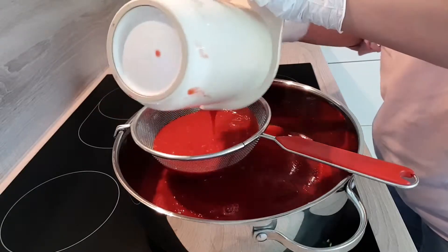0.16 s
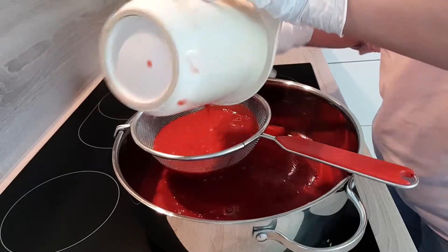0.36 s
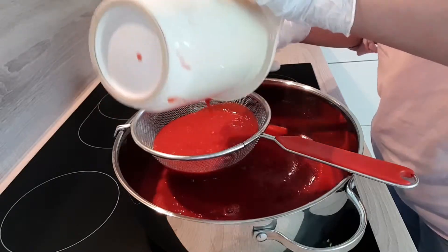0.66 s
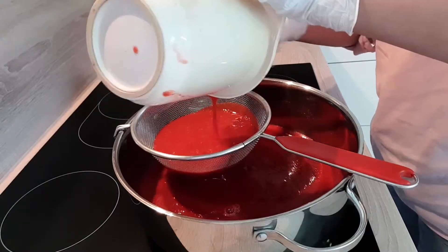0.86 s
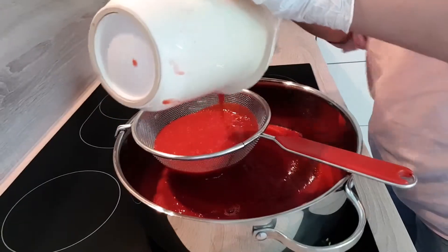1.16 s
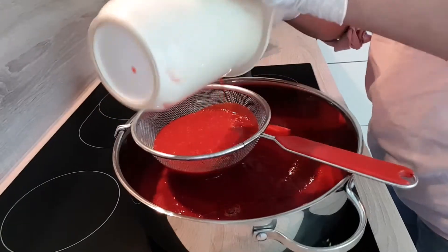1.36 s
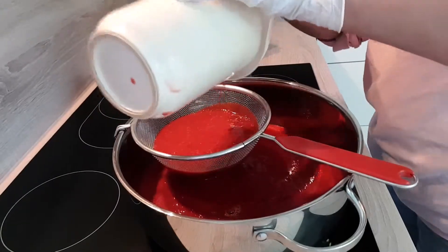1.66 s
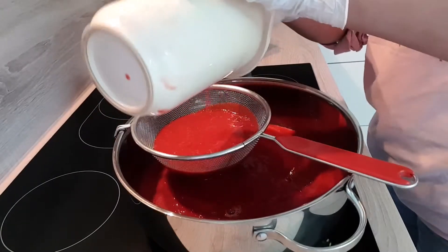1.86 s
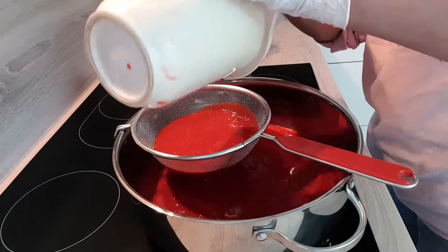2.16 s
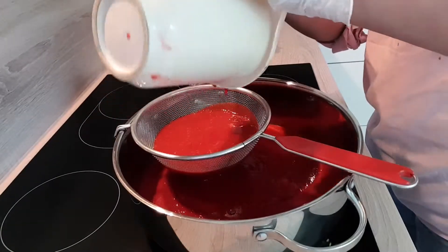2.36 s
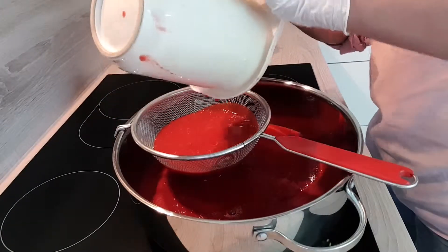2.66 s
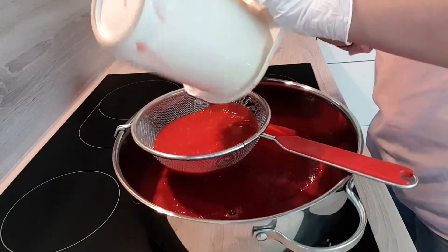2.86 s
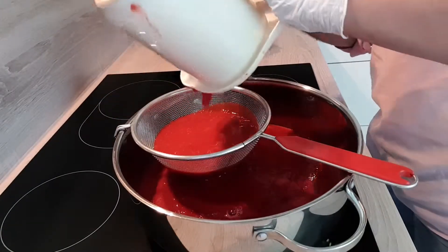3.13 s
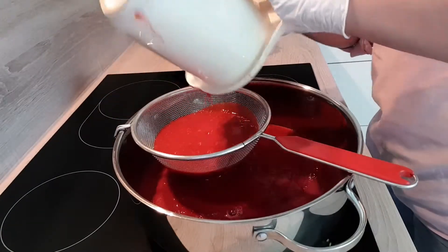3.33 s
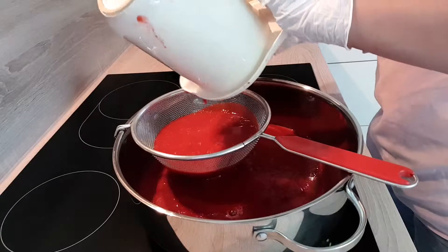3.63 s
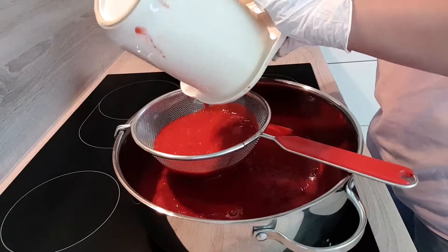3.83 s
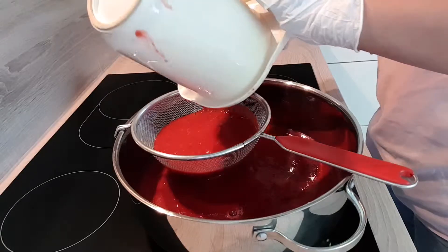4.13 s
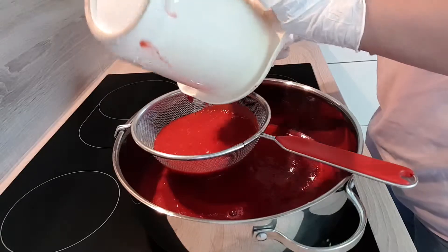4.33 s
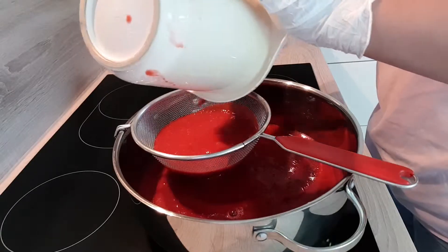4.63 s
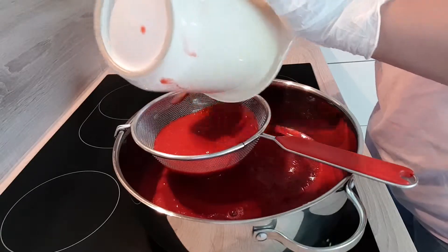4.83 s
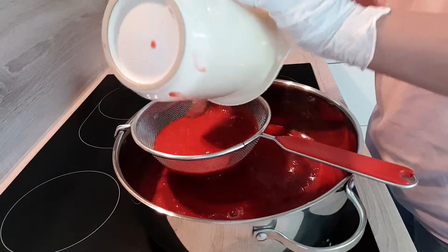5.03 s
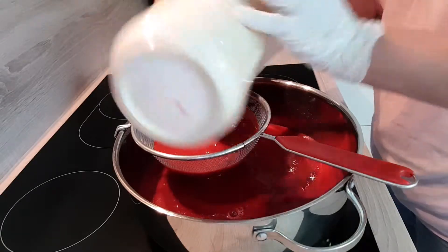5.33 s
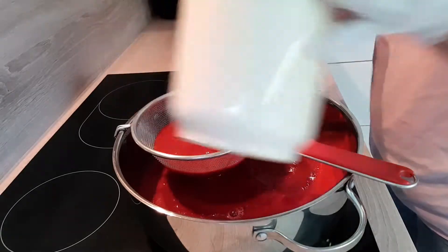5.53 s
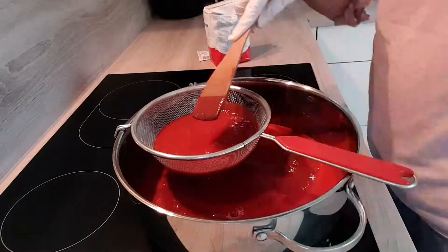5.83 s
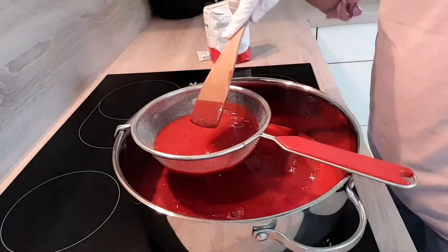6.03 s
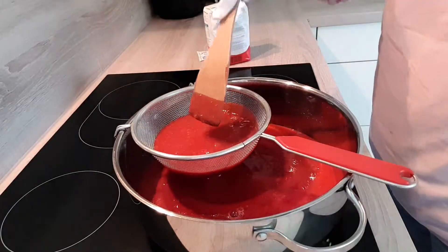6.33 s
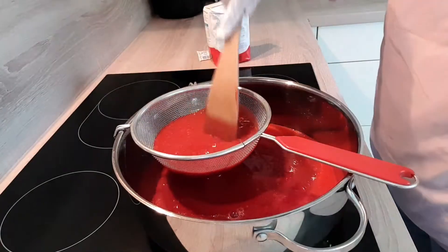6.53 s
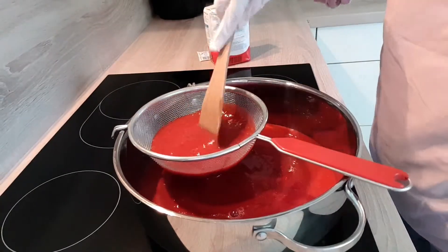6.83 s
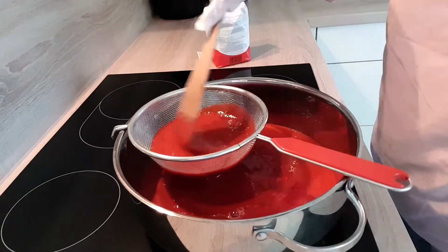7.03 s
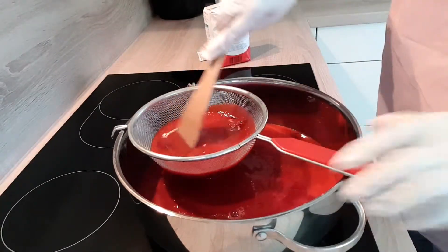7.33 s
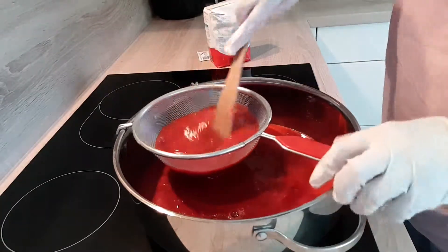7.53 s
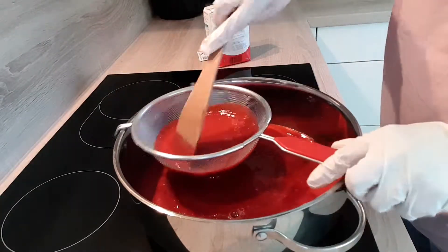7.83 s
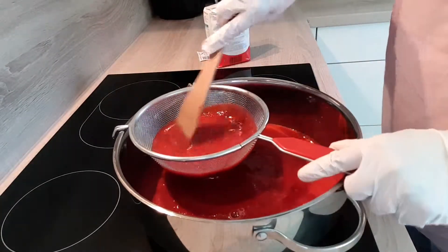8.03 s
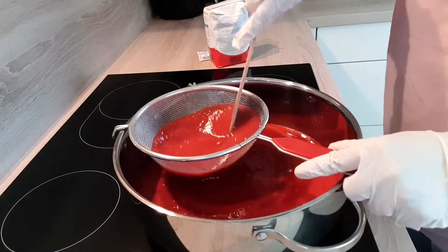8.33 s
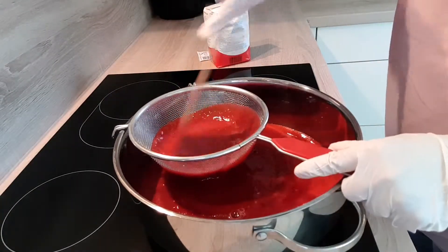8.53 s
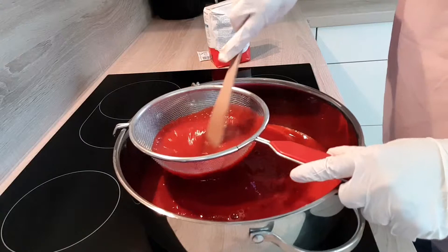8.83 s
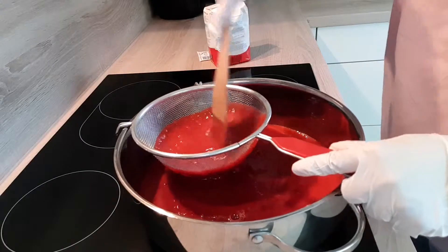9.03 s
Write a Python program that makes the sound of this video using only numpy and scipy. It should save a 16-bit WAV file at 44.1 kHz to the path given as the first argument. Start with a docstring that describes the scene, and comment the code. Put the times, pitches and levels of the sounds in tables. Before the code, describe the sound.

A small kitchen with short reflections, heard closely in stereo over faint hiss. From 0.1 to 1.6 s, blobs of puree smack sharply into a steel sieve, bright and wet, with wiry ringing and a hollow mid-low note from the pot; the strongest lands near 0.8 s. Dull, rounded plops begin at 1.3 s and cluster around 1.9-2.4, 3.1 and 4.1 s. Low handling rumble and glove rubs rise near 3 s, with more rustles at 3.8-4.5 s. A last, duller smack falls at 4.9 s. Around 5.4-5.9 s the jug and gloves rub and squeak briefly. A heavy soft thump at 6.3 s comes with a faint wet hiss. From 6.7 s light ticks and gritty spatula presses work the mesh, with woody-metallic knocks at 7.4 and 7.9 s, low rumble around 8.1 s, and a stronger scrape and quick knocks at 8.7-8.9 s.

```python
"""A small kitchen, with a pair of microphones close to a steel sieve over a pot; a faint hiss runs throughout.
First come sharp wet smacks: noise bursts, ringing resonances and a hollow note of air. Dull plops mingle with
the smacks and go on among rubs, rustles and squeaks of gloves and jug: friction noise. Last a wooden spatula
knocks on the sieve and presses the puree through the mesh in gritty strokes. Handling and soft blows rumble
through the worktop as low noise and decaying sines."""
import sys
import numpy as np
from scipy import signal
from scipy.fft import rfft, irfft, next_fast_len
from scipy.io import wavfile
from scipy.ndimage import map_coordinates

SR = 44100
rng = np.random.default_rng(int(sys.argv[2]) if len(sys.argv) > 2 else 0)


def dump_mix(stems):
    """Bounce the given channels to the path in sys.argv[1] as a 16-bit WAV at rate SR."""
    frames = np.atleast_2d(stems).T  # one column per channel
    limited = np.clip(frames, -1, 1)  # hard clip at full scale
    pcm = np.round(limited * 32767).astype(np.int16)
    wavfile.write(sys.argv[1], SR, pcm)


N = 405279  # length in samples

# background hiss over time: start_s [s], level_db [dB]
AIR_LEVEL = [(0, -66.5), (1.597, -71.5), (2.599, -63.5), (3.498, -60.5), (3.702, -73.5), (5.298, -71.5),
             (8.503, -62), (9.19, -58.5)]
# colour of the background hiss: freq_hz [Hz], density_db [dB per Hz, relative]
AIR_SPECTRUM = [(30, -7.5), (250, -29.5), (500, -18), (900, -25.5), (2300, -21.5), (3400, -25.5),
                (7400, -17.5), (9500, -32), (12300, -24.5), (15500, -30.5)]
# how long the room rings at each frequency: freq_hz [Hz], t60_s [s]
ROOM_DECAY = [(500, 0.41), (3700, 0.33), (9700, 0.26)]
WALL_S, WALL_DB = 0.0064, -5.5  # delay of the wall's echo, and its level over the room's answer
RIGHT_DB = 0.66  # each microphone's share of the lean to the right
TOP_HZ = 15600  # band limit of the recorder

# soft blows on the worktop: start_s [s], level_db [dB], pitch_hz [Hz], t60_s [s]
WORKTOP_BLOWS = [(0.879, -34, 79.8, 0.25), (1.108, -21, 179, 0.024), (1.141, -26, 100.6, 0.12),
                 (2.84, -19.5, 64.5, 0.19), (3.936, -22.5, 66.7, 0.31), (6.261, -4, 103.3, 0.078),
                 (6.264, -22.5, 182, 0.12), (7.355, -23, 121.8, 0.26), (7.812, -26.5, 99, 0.18),
                 (8.009, -17.5, 105.5, 0.25), (8.586, -26.5, 106, 0.11)]
# colour of the worktop's rumble: freq_hz [Hz], density_db [dB per Hz, relative]
WORKTOP_SPECTRUM = [(20, -25.5), (58, 3), (110, -3), (190, -23.5), (500, -27), (900, -74)]
# resonances of the pot under the sieve: freq_hz [Hz], width_hz [Hz], level_db [dB]
POT_MODES = [(92, 72, 1), (121, 39, -1.4), (156.3, 8, -2)]
GRIP_S = 7.1  # from this time on a hand holds the sieve
# handling rumble over time, before its lumps: start_s [s], level_db [dB]
HANDLING_LEVEL = [(2.0, -74.5), (2.699, -59), (2.98, -38.5), (3.24, -44.5), (3.699, -67), (3.92, -58),
                  (4.84, -57), (5.0, -64), (5.449, -66), (5.68, -36.5), (6.18, -51), (6.48, -45),
                  (7.41, -53.5), (7.78, -57), (8.01, -38), (8.149, -31), (8.451, -64.5), (8.767, -36),
                  (9.1, -76)]
HANDLING_BOWL_DB = -22.5  # its share in the bowl of the sieve
LUMPS_DB = 2.3  # random swing of the rumble

# glove and jug rubs: start_s [s], rise_s [s], level_db [dB of rasp], brightness_db [dB], contact_hz [Hz]
RUBS = [(2.76, 0.07, -57.5, -3.5, 1700), (3.03, 0.02, -43.5, -7, 1720), (3.752, 0.01316, -45.5, -8.5, 996),
        (3.905, 0.0036, -38, 5, 1751), (4.525, 0.059, -39.5, -3, 1092), (5.433, 0.025, -45.5, 0, 1492),
        (5.785, 0.01, -44, 1.5, 1204), (5.835, 0.02, -37, -3.5, 1540), (7.812, 0.013, -62, 5, 2260)]
RUB_FALL_S = 0.066  # release
RUB_RUMBLE_DB, RUB_BOWL_DB, RUB_HISS_DB = 3, -7, 0.45  # over the rasp, before brightness
# long soft hisses of puree in the mesh: start_s [s], level_db [dB of hiss], contact_hz [Hz]
SEEPS = [(3.26, -71.5, 2084), (6.213, -49, 2411)]
SEEP_RISE_S, SEEP_FALL_S = .06, 0.37
SEEP_RUMBLE_DB, SEEP_BOWL_DB, SEEP_RASP_DB = 10, -27.5, -7.5  # over the hiss
# the spatula presses against the mesh: start_s [s], rise_s [s], level_db [dB of bowl]
PRESSES = [(6.703, 0.013, -48), (6.82, 0.034, -61.5), (7.12, 0.048, -66), (7.301, 0.0066, -52),
           (7.397, 0.0097, -41.5), (7.942, 0.0032, -47), (7.99, 0.12, -41), (8.11, 0.072, -43),
           (8.245, 0.013, -45), (8.705, 0.011, -33.5), (8.755, 0.027, -44.5)]
PRESS_FALL_S, FALL_PER_RISE = 0.027, 0.43  # a slow push also lets go slowly
PRESS_RUMBLE_DB, PRESS_RASP_DB, PRESS_HISS_DB = -5.5, -19, -13.5  # over the bowl
PRESS_CONTACT_HZ = 1460
# colour of the rasp in the mesh: freq_hz [Hz], density_db [dB per Hz, relative]
RASP_SPECTRUM = [(200, -25), (480, 3.5), (1100, -0.5), (2100, -3.5), (3500, -10), (5500, -35)]
# colour of the hiss in the mesh: freq_hz [Hz], density_db [dB per Hz, relative]
HISS_SPECTRUM = [(2200, -8.5), (4000, -0.5), (7400, 0), (9000, -7.5), (12000, -7), (15000, -16.5)]
# resonances of the bowl of the sieve: freq_hz [Hz], width_hz [Hz], level_db [dB]
BOWL_MODES = [(370.7, 30, 5), (469, 6.7, -1), (610, 110, 2.5), (803, 32, 1), (964, 22, -7),
              (1224, 24, -9.5), (1530, 40, -13.5)]
BOWL_TOP_HZ = 1466  # the wet wood drives little above this
CATCH_RATE, CATCH_S = 67, 0.023  # the wood catches on the mesh: catches a second, and fading time of each
JUDDER_DB = 1.8  # random swing of the strokes

# brief wet squelches: start_s [s], length_s [s], level_db [dB], mid_pitch_hz [Hz]
SQUELCHES = [(2.15, 0.056, -67, 1900), (8.245, 0.0506, -53, 1565)]
SQUELCH_WIDTH, SQUELCH_GLIDE = 0.097, 0.187  # reach to each side and whole rise, as shares of the pitch
# squeaks of rubbed surfaces: start_s [s], length_s [s], level_db [dB], pitch_hz [Hz]
SQUEAKS = [(5.8, 0.043, -38, 2750), (5.832, 0.051, -31, 1514), (6.3, 0.1, -51, 2274)]
SQUEAK_WIDTH = 0.079  # reach to each side, as a share of the pitch
# the spatula knocks on the sieve: start_s [s], level_db [dB]
KNOCKS = [(7.405, -14.5), (7.946, -14.5), (8.712, -8.5), (8.806, -11.5), (8.864, -16.5)]
# small ticks: start_s [s], level_db [dB before the gains of noise and ring], pitch_hz [Hz]
TICKS = [(0.451, -44, 2523), (6.674, -37.5, 7200), (6.706, -37.5, 5770), (7.599, -44.5, 4960),
         (7.944, -42.5, 1950), (8.705, -37, 2400)]

# dull plops, dB before the gains of layers and drops:
# start_s [s], level_db [dB], hollow_hz [Hz], ring_hz [Hz], splash_db [dB]
PLOPS = [(1.256, -19.5, 393, 1857, -38), (1.894, -24, 500, 1742, -46), (2.063, -28, 488, 1796, -52.5),
         (2.222, -25, 534, 1670, -39), (2.437, -26, 577, 990, -62), (3.06, -29.5, 486, 1680, -38),
         (3.164, -32.5, 600, 1396, -47), (3.222, -26.5, 510, 1153, -48), (4.094, -31, 613, 1195, -30.5),
         (4.175, -29, 569, 1184, -43)]
# ring over the hollow at this pitch, before the layer gains; higher rings are stronger
PLOP_RING_DB, PLOP_RING_HZ, RING_DB_PER_OCTAVE = -2.5, 1620, 8.5
OVERTONE_RATIO, OVERTONE_DB = 1.28, -11  # second partial of a plop's ring
# sharp wet smacks, dB before the gains of layers and drops:
# start_s [s], crack_db [dB], hollow_db [dB], hollow_hz [Hz], ring_hz [Hz]
SMACKS = [(.122, -18.5, -36.5, 753, 1517), (.460, -20, -33, 552, 2530), (.77, -14.5, -26.5, 534, 2580),
          (1.051, -32, -36.5, 770, 1580), (1.129, -27, -37, 762, 1590), (1.606, -17.5, -29.5, 760, 2120),
          (4.887, -41, -27.5, 554, 1344)]
SMACK_RING_DB = -25.5  # every smack rings the sieve about equally; before the layer gains
SPRAY_DB, SPRAY_GROWS = -4.5, 1.574  # spray at a crack of 0 dB; dB of spray per dB of crack
LINGER_DB, LINGER_WIDTH_HZ = -22, 5.6  # the faint ring that outlasts a smack, over its crack
DROP_GAIN_DB = 25.0  # common gain of smacks and plops
# resonances of the hollow of the pot: freq_hz [Hz], width_hz [Hz], level_db [dB]
HOLLOW_MODES = [(417, 100, 0.5), (496.8, 57, 5.5)]
# higher ringing resonances: freq_hz [Hz], width_hz [Hz], level_db [dB]
RING_MODES = [(1190, 320, -5.5), (1364, 74, 2.5), (1440, 260, -0.5), (1780, 240, 9.5), (2280, 85, -10.5)]
# resonances of the wire sieve: freq_hz [Hz], width_hz [Hz], level_db [dB]
WIRE_MODES = [(2390, 65, -4.5), (3148, 27, -2.5), (4000, 110, -1), (5657, 89, 1), (7520, 510, -7.5)]
# colour of a smack's crack: freq_hz [Hz], density_db [dB per Hz, relative]
CRACK_SPECTRUM = [(300, -38), (850, -18.5), (2000, -4), (3000, -0.5), (4100, -7), (5600, -0.5),
                  (7100, -3.5), (12000, -36)]
# colour of a smack's spray: freq_hz [Hz], density_db [dB per Hz, relative]
SPRAY_SPECTRUM = [(5000, -45), (8500, -6.5), (12000, -6.5), (15000, -18.5)]
# colour of the splash of smacks and plops: freq_hz [Hz], density_db [dB per Hz, relative]
SPLASH_SPECTRUM = [(250, -10), (1400, 8.5), (2500, 7), (3500, -2.5), (6000, -12.5), (15000, -41.5)]
POT_AIR_HZ, POT_AIR_T60_S, POT_AIR_RISE_S = 505.5, 0.29, 0.016  # the note of the air in the pot
AIR_SAG = .06  # the note starts higher by this share and sinks onto its pitch
SMACK_AIR_DB, PLOP_AIR_DB = -9, -13  # its level over hollow_db of a smack and level_db of a plop


def amp(db):
    """Decibels to gain."""
    return 10 ** (np.asarray(db) / 20)


def unit(x):
    """x at rms 1."""
    return x / np.sqrt(np.mean(x ** 2) + 1e-20)


def unit_energy(x):
    """Each channel of x with energy 1."""
    return x / np.linalg.norm(x, axis=-1, keepdims=True)


def along(points, hz):
    """(Hz, value) points read on a log frequency axis."""
    freq, value = np.transpose(points)
    return np.interp(np.log(hz + 1), np.log(freq + 1), value)


def over_time(points):
    """(s, value) points joined by straight lines, one value a sample."""
    return np.interp(np.arange(N) / SR, *np.transpose(points))


def wobble(rate):
    """A smooth random curve, rate knots a second."""
    knots = rng.standard_normal(int(N * rate / SR) + 4)
    return map_coordinates(knots, [np.arange(N) * rate / SR])


def filtered(x, response):
    """x times a response of frequency."""
    n = x.shape[-1]
    m = next_fast_len(n + 8192)  # padding keeps the filter's ring from wrapping round
    return irfft(rfft(x, m) * response(np.fft.rfftfreq(m, 1 / SR)), m)[..., :n]


def coloured(x, spectrum):
    """x with a (Hz, dB) spectrum, at rms 1."""
    return unit(filtered(x, lambda hz: amp(along(spectrum, hz))))


def resonate(x, modes):
    """x through a bank of damped resonances, with dark valleys between them."""
    def bank(f):
        return sum(amp(db) * 1j * f * width / (centre ** 2 - f * f + 1j * f * width)
                   for centre, width, db in modes)
    return filtered(x, bank)


def muffled(x, top_hz):
    """x through a soft contact, which carries little treble."""
    return filtered(x, lambda hz: 1 / (1 + 1j * hz / top_hz - (hz / top_hz) ** 2))


def add(track, s, sound):
    """Mix a sound into the track at time s."""
    part = track[..., round(s * SR):][..., :sound.shape[-1]]
    part += sound[..., :part.shape[-1]]


def kitchen(x, wet_db):
    """x, the echo of the wall by the hob and a room answer unlike at each microphone; treble dies first."""
    hz, t, bins = signal.stft(rng.standard_normal((2, SR // 2)), SR, nperseg=256)
    decay = amp(-60 * t / along(ROOM_DECAY, hz)[:, None])
    tail = unit_energy(signal.istft(bins * decay, SR, nperseg=256)[1])
    tail[:, round(WALL_S * SR)] += amp(WALL_DB)
    answer = signal.fftconvolve(np.atleast_2d(x), unit_energy(tail), axes=1)
    return x + amp(wet_db) * answer[:, :x.shape[-1]]


def air():
    """A faint background hiss of changing level, with one quick drop."""
    return amp(over_time(AIR_LEVEL)) * coloured(rng.standard_normal((2, N)), AIR_SPECTRUM)


def worktop(rumble_gain):
    """Lumpy low rumble and soft blows, decaying sines, reach both microphones alike before the room answers."""
    # once a hand holds the sieve down on the pot, the strokes boom in the pot's higher resonances
    held = np.clip(10 * (np.arange(N) / SR - GRIP_S), 0, 1)
    boom = unit(muffled(resonate(rng.standard_normal(N), POT_MODES), top_hz=171))
    deep = coloured(rng.standard_normal(N), WORKTOP_SPECTRUM)
    out = amp(LUMPS_DB * wobble(11)) * rumble_gain * (held * boom + (1 - held) * deep)
    t, drift = np.arange(SR // 2) / SR, wobble(35)
    for s, db, hz, t60 in WORKTOP_BLOWS:
        swell = 1 - np.exp(-(t / (0.072 * t60)) ** 2)
        # the loose supports blur the pitch as the blow dies away
        blur = 3 * t / t60 * drift[round(s * SR):][:len(t)]
        add(out, s, amp(db - 60 * t / t60) * swell * np.sin(2 * np.pi * hz * t + blur))
    return kitchen(out, wet_db=-10.5)


def movements():
    """Rubs, presses and seeps by time: (s, rise s, fall s, contact Hz, dB of rumble, bowl, rasp and hiss)."""
    rows = []
    for s, rise, db, bright_db, hz in RUBS:
        layers_db = np.array([RUB_RUMBLE_DB, RUB_BOWL_DB - bright_db, 0, RUB_HISS_DB + bright_db])
        rows.append((s, rise, RUB_FALL_S, hz, db + layers_db))
    for s, rise, db in PRESSES:
        layers_db = np.array([PRESS_RUMBLE_DB, 0, PRESS_RASP_DB, PRESS_HISS_DB])
        rows.append((s, rise, PRESS_FALL_S + FALL_PER_RISE * rise, PRESS_CONTACT_HZ, db + layers_db))
    for s, db, hz in SEEPS:
        layers_db = np.array([SEEP_RUMBLE_DB, SEEP_BOWL_DB, SEEP_RASP_DB, 0])
        rows.append((s, SEEP_RISE_S, SEEP_FALL_S, hz, db + layers_db))
    return sorted(rows, key=lambda row: row[0])


def pressure():
    """Gains of rumble, bowl, rasp and hiss: each stroke builds up, then eases off, over the handling."""
    gains, t = np.zeros((4, N)), np.arange(SR) / SR
    gains[:2] = amp([[0], [HANDLING_BOWL_DB]]) * amp(over_time(HANDLING_LEVEL))
    for s, rise, fall, _, levels_db in movements():
        push = np.minimum(t / rise, 1) * np.exp(-(np.maximum(t - rise, 0) / fall) ** 2)
        add(gains, s, amp(levels_db)[:, None] * push)
    return gains


def grit(rate, grain_share):
    """Friction: a smooth rush plus many tiny slips of uneven size, rate slips a second."""
    slips = (rng.random(N) < rate / SR) * rng.standard_normal((2, N))
    rush = rng.standard_normal((2, N))
    return np.sqrt(1 - grain_share) * rush + np.sqrt(grain_share) * unit(slips)


def catches():
    """Stick and slip: a gain of rms 1 that jumps at each catch and sinks back to an even drag."""
    jumps = (rng.random(N) < CATCH_RATE / SR) * (.5 + rng.random(N))
    fading = signal.lfilter([1], [1, -np.exp(-1 / (CATCH_S * SR))], jumps)
    return unit(1 + unit(fading))


def gliding_resonance(width_hz):
    """Narrow noise of rms 1 whose centre glides from one stroke's point of contact to the next."""
    centre = over_time([(s + rise, hz) for s, rise, _, hz, _ in movements()])
    slow = filtered(rng.standard_normal((2, N)), lambda hz: 1 / (1 + (hz / width_hz) ** 2))
    return unit(slow * np.cos(2 * np.pi * np.cumsum(centre) / SR))


def strokes(bowl_gain, rasp_gain, hiss_gain):
    """Wet rubbing sounds the bowl of the sieve, rasps and hisses in the mesh; the grip is never even."""
    drag = catches() * grit(rate=400, grain_share=0.46)
    bowl = bowl_gain * unit(muffled(resonate(drag, BOWL_MODES), BOWL_TOP_HZ))
    rough = coloured(grit(rate=180, grain_share=0.065), RASP_SPECTRUM)
    rasp = rasp_gain * (rough + amp(-1.0) * gliding_resonance(width_hz=380))
    hiss = hiss_gain * coloured(grit(rate=1300, grain_share=0.31), HISS_SPECTRUM)
    unevenness = amp(JUDDER_DB * wobble(55))
    return kitchen((bowl + rasp + hiss) * unevenness, wet_db=0.0)


def narrow_tones(rows, width, glide):
    """Narrow noises that swell and stop; width (to each side) and glide are shares of the pitch."""
    out = np.zeros(N)
    for s, length, db, hz in rows:
        progress = np.minimum(np.arange(SR // 2) / SR / length, 1)
        noise = rng.standard_normal(len(progress))
        flutter = unit(filtered(noise, lambda f: 1 / (1 + (f / (width * hz)) ** 4)))
        pitch = hz * (1 + glide * (progress - .5))
        tone = np.sin(2 * np.pi * np.cumsum(pitch) / SR)
        add(out, s, amp(db) * np.sin(np.pi * progress) * flutter * tone)
    return out


def squelches():
    """Puree squeezes through small gaps with a rising note; rubbed surfaces squeak on one pitch."""
    wet = narrow_tones(SQUELCHES, SQUELCH_WIDTH, SQUELCH_GLIDE)
    squeaks = narrow_tones(SQUEAKS, SQUEAK_WIDTH, glide=0)
    return kitchen(wet + squeaks, wet_db=3.5)


def burst(spectrum, rise, t60):
    """A wet film bursts: a short stereo noise of energy 1 in each channel; rise and t60 in seconds."""
    t = np.arange(SR // 2) / SR
    envelope = np.minimum(t / rise, 1) ** 2 * amp(-60 * np.maximum(t - rise, 0) / t60)
    return unit_energy(envelope * coloured(rng.standard_normal((2, len(t))), spectrum))


def struck(modes):
    """One blow of energy 1 on modes of slightly new strength; neighbours swing in opposite directions."""
    blow = signal.unit_impulse(SR // 2)
    out = np.zeros(SR // 2)
    for k, mode in enumerate(modes):
        strength = amp(1.5 * rng.standard_normal())
        out += (-1) ** k * strength * resonate(blow, [mode])
    return unit_energy(out)


def knocks():
    """The spatula bumps the bowl of the sieve and rings it briefly."""
    out = np.zeros(N)
    for s, db in KNOCKS:
        add(out, s, amp(db) * muffled(struck(BOWL_MODES), BOWL_TOP_HZ))
    return kitchen(out, wet_db=-6.0)


def ticks():
    """Light flicks against the wires of the mesh, each with a pitch of its own."""
    out = np.zeros((2, N))
    for s, db, hz in TICKS:
        noise = amp(db + 21.5) * burst(HISS_SPECTRUM, rise=0.0053, t60=0.017)
        ring = amp(db + 16) * struck([(hz, 450, 0)])
        add(out, s, kitchen(noise + ring, wet_db=-1.5))
    return out


def pot_air():
    """The air in the pot swells into one note, sinks a little and rings on; energy 1."""
    t = np.arange(SR) / SR
    decay = amp(-60 * t / POT_AIR_T60_S)
    hz = POT_AIR_HZ * (1 + AIR_SAG * decay)
    phase = 2 * np.pi * np.cumsum(hz) / SR + np.pi / 4 * wobble(40)[:SR]
    return unit_energy((1 - np.exp(-t / POT_AIR_RISE_S)) * decay * np.sin(phase))


def plops():
    """Softer drops mostly sound the hollow and the air in the pot, with a short higher ring."""
    out = np.zeros((2, N))
    for s, db, hollow_hz, ring_hz, splash_db in PLOPS:
        ring_db = db + PLOP_RING_DB + RING_DB_PER_OCTAVE * np.log2(ring_hz / PLOP_RING_HZ)
        hollow = amp(db - 10) * struck([(hollow_hz, 50, 0)]) + amp(db - 7) * struck(HOLLOW_MODES)
        partials = [(ring_hz, 45, 0), (OVERTONE_RATIO * ring_hz, 70, OVERTONE_DB)]
        ring = amp(ring_db - 10) * struck(partials) + amp(ring_db - 11) * struck(RING_MODES)
        body = muffled(hollow + ring, top_hz=2270)
        splash = amp(splash_db) * burst(SPLASH_SPECTRUM, rise=0.00022, t60=0.067)
        add(out, s, kitchen(body + splash, wet_db=-2.5))
        add(out, s, amp(db + PLOP_AIR_DB) * pot_air())
    return amp(DROP_GAIN_DB) * out


def smacks():
    """Sharp wet smacks: bright crack and spray, ringing wires, a note of trapped air and a hollow resonance."""
    out = np.zeros((2, N))
    for s, crack_db, hollow_db, hollow_hz, ring_hz in SMACKS:
        hollow = amp(hollow_db - 3.5) * struck([(hollow_hz, 70, 0)])
        hollow += amp(hollow_db - 4.5) * struck(HOLLOW_MODES)
        ring = amp(SMACK_RING_DB - 6.0) * struck([(ring_hz, 75, 0)])
        ring += amp(SMACK_RING_DB - 12.5) * struck(RING_MODES)
        linger = amp(LINGER_DB + crack_db) * struck([(ring_hz, LINGER_WIDTH_HZ, 0)])
        wire = amp(crack_db - 8.5) * struck(WIRE_MODES)
        splash = amp(SMACK_RING_DB - 1.5) * burst(SPLASH_SPECTRUM, rise=0.0012, t60=0.046)
        crack = amp(crack_db) * burst(CRACK_SPECTRUM, rise=0.0022, t60=0.037)
        spray = amp(SPRAY_DB + SPRAY_GROWS * crack_db) * burst(SPRAY_SPECTRUM, rise=0.0013, t60=0.073)
        impact = hollow + ring + wire + splash + crack + spray
        add(out, s, kitchen(impact, wet_db=-1.5) + linger)
        add(out, s, amp(hollow_db + SMACK_AIR_DB) * pot_air())
    return amp(DROP_GAIN_DB) * out


def scene():
    """Sieve and worktop lie slightly to the right; the background hiss is not shifted."""
    rumble_gain, bowl_gain, rasp_gain, hiss_gain = pressure()
    drops = smacks() + plops()
    spatula_and_hands = ticks() + knocks() + squelches() + strokes(bowl_gain, rasp_gain, hiss_gain)
    near = drops + spatula_and_hands + worktop(rumble_gain)
    return near * amp([[-RIGHT_DB], [RIGHT_DB]]) + air()


def record(dry):
    """The recorder cuts off steeply above its band limit."""
    return filtered(dry, lambda hz: 1 / np.sqrt(1 + (hz / TOP_HZ) ** 120))


dry = scene()
out = record(dry)
dump_mix(out)
```